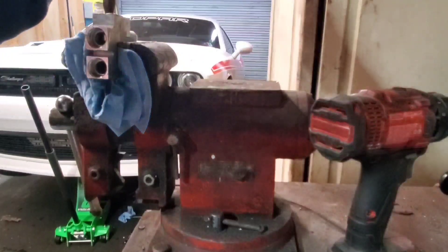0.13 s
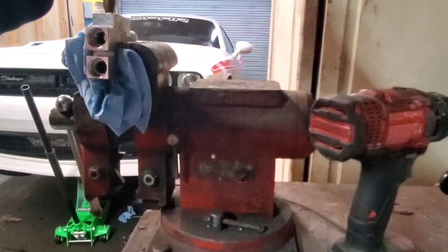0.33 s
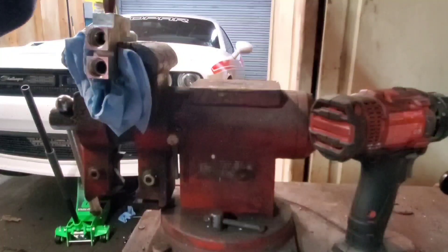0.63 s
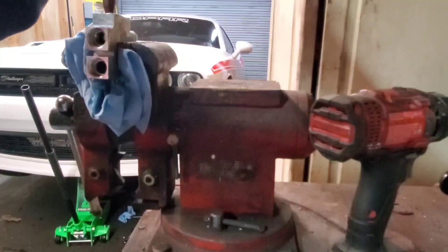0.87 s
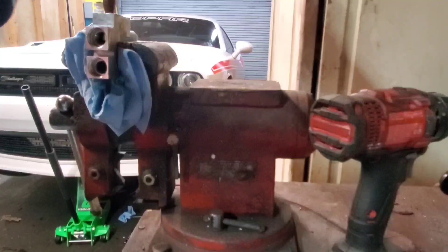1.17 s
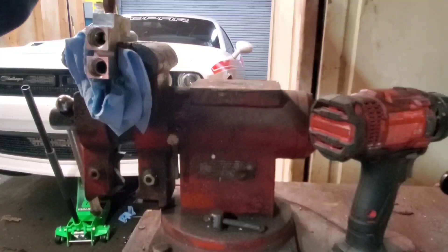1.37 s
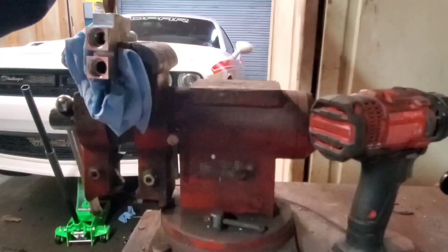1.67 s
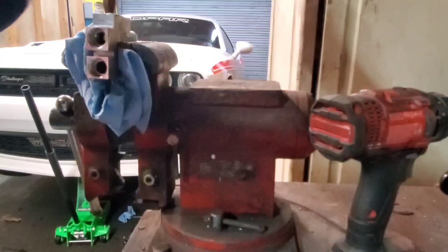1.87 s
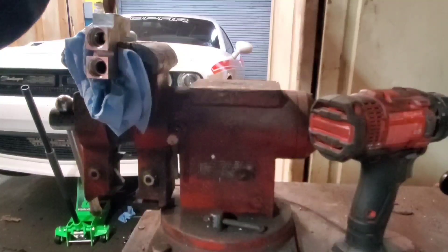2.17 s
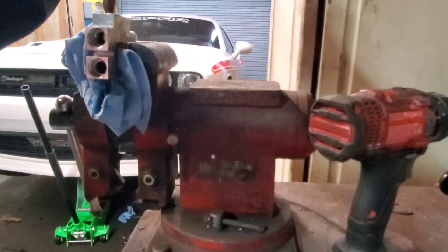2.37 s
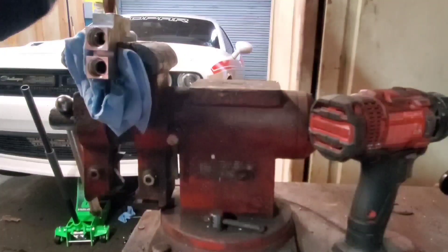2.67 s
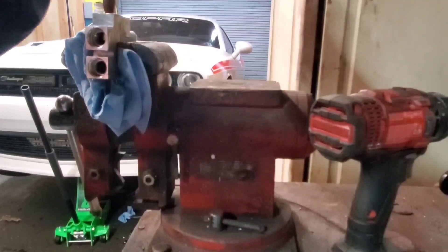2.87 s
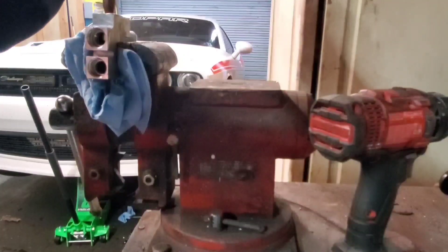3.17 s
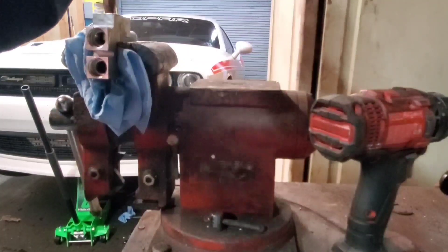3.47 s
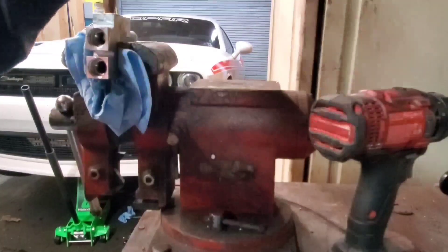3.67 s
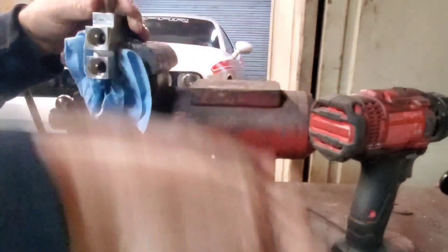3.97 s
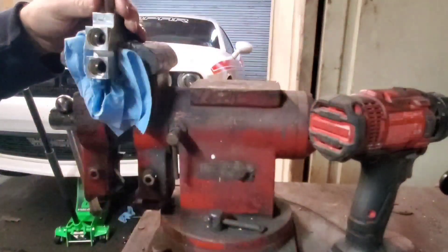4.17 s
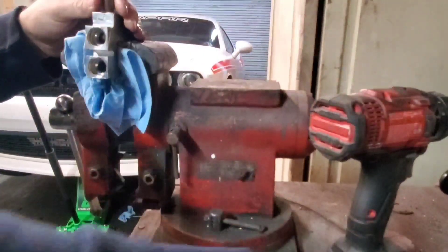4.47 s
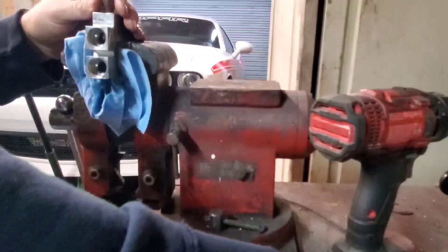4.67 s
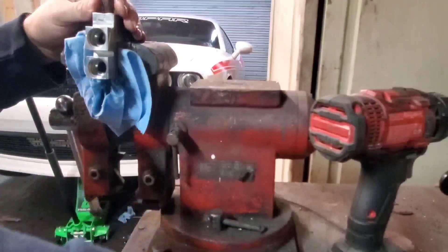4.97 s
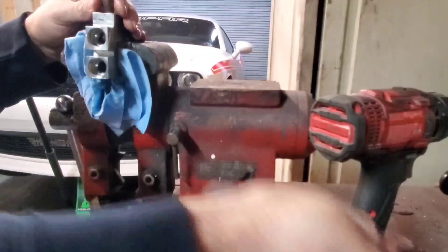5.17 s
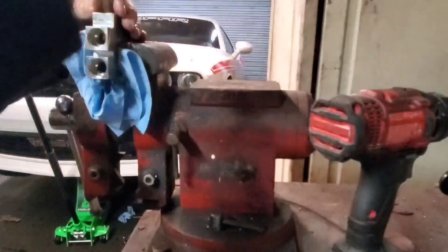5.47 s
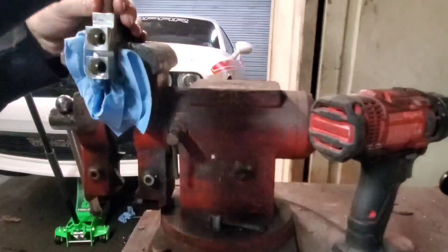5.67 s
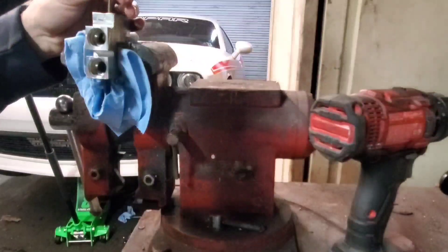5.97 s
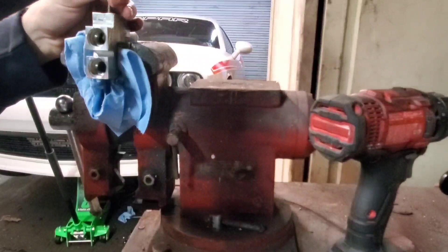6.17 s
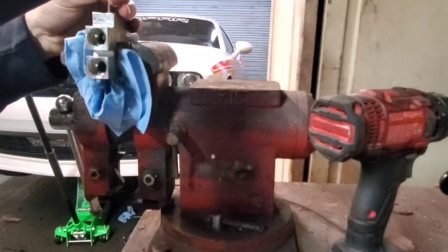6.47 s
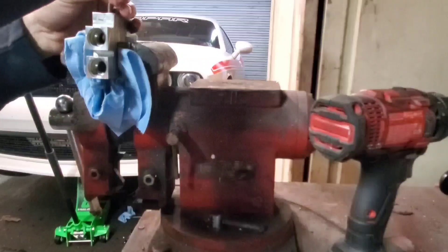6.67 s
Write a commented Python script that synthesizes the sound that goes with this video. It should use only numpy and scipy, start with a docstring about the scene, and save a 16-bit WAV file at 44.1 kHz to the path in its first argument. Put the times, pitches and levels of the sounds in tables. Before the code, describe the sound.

Metal knocks in a workshop, a loud clatter of tools on a wooden bench and a brief rattle, with a low engine drone outside.

```python
"""A garage workshop, with road noise coming through the door throughout. First sleeves rustle and a steel
rod knocks on a part held in a vise, exciting its damped modes, which reverberate in the room. Near 3 s an
engine outside hums; at 3.8 s it catches, and its firing rate climbs to a steady drone. Meanwhile tools
are dropped on and dragged from a wooden bench: the wood thuds, the rod is tapped once, steel clinks.
Near 5.8 s the rod catches in the part, rattles and briefly scrapes; two light knocks and a thud follow."""
import sys
import numpy as np
from scipy import signal
from scipy.io import wavfile

SR = 44100
rng = np.random.default_rng(int(sys.argv[2]) if len(sys.argv) > 2 else 0)


def wav_out(sig):
    """Save sig, one row per channel (or a flat mono array), as 16-bit PCM at SR to the path in sys.argv[1]."""
    wavfile.write(sys.argv[1], SR, np.round(np.clip(np.atleast_2d(sig).T, -1, 1) * 32767).astype(np.int16))


N = 300321

# road noise: (time [s], rumble level [dB], tyre roar level [dB])
ROAD_LEVELS = [(0, -52.5, -67), (.38, -46, -65), (1.0, -52.5, -63.5), (2.1, -51.5, -60), (2.72, -49.5, -62),
               (4.2, -51, -63.5), (5.4, -50.5, -66), (6.81, -48.5, -67)]
# spectra of rumble, tyre roar, microphone hiss and friction: (frequency [Hz], relative density [dB])
RUMBLE_SPECTRUM = [(22, -41), (40, -7), (55, 2), (78, 4.5), (107, -13), (140, -8.5), (242, -19.5)]
ROAR_SPECTRUM = [(150, -12.5), (300, -9), (546, 3), (975, -6.5), (1400, -11.5), (1800, -56)]
HISS_SPECTRUM = [(1500, -5), (5000, -19.5), (7800, -8.5), (10000, -19), (15500, -20.5)]
FRICTION_SPECTRUM = [(1500, -2.5), (7000, -9.5), (9500, -8), (12000, -17.5), (15500, -27.5)]
# likeness of left and right: (frequency [Hz], coherence [ratio])
COHERENCE = [(240, 0.89), (950, 0.76), (3770, 0.12), (15000, 0.0092)]
# sleeves rustling, and a short hissing scrape of the rod near 5.9 s: (time [s], duration [s], level [dB])
RUBS = [(0.443, 0.15, -70), (1.142, 0.066, -74.5), (1.868, 0.15, -73), (2.716, 0.094, -70.5),
        (3.504, 0.2, -68), (3.908, 0.35, -73.5), (4.25, 0.05, -62), (4.72, 0.19, -62.5), (4.94, 0.19, -66),
        (5.909, 0.045, -51), (5.301, 0.033, -68), (6.743, 0.018, -61.5)]
# rod on the part: (time [s], level [dB], centre [Hz], fall-off [dB/octave^2], low-mode gain [dB])
ROD_KNOCKS = [(0.469, -31, 1320, 5, 5), (0.569, -21.5, 3520, 14.5, 55.5), (1.905, -58, 2440, 32, -7),
              (1.997, -32, 2200, 3, 8), (2.069, -36.5, 2410, 16, -11), (2.078, -34.5, 1900, 3.5, -7),
              (2.632, -26, 2380, 5, -5), (6.407, -41.5, 1350, -10.5, -3), (6.569, -46.5, 1636, 3, 1)]
# reverberation: (frequency [Hz], T60 [s], level [dB])
ROOM_DECAY = [(126.6, 1, -9.5), (352, 0.55, -1.5), (1010, 0.38, -1.5), (2870, 0.36, -7),
              (7000, 0.098, -7.5), (13000, .2, -21)]
# tools on the bench, and a tap on the rod: (time [s], level [dB], centre [Hz])
LANDINGS = [(3.55, -38, 360), (4.203, -33.5, 148), (4.311, -6.5, 318), (4.33, -4, 388), (4.363, -10, 477),
            (4.376, -18, 478.4), (4.407, -6.5, 554), (4.453, -17.5, 476), (4.553, -9, 446),
            (4.733, -14.5, 357), (4.747, -7.5, 472), (4.811, -28.5, 164), (4.957, -27, 377),
            (6.578, -41.5, 188.8), (5.026, -23, 196), (5.048, -20.5, 170)]
TAPS = [(3.671, -42, 1964)]
# engine run-up, a fast and a slow term: (shortfall from the final rate [Hz], time constant [s])
RUN_UP = [(24.82, .2), (14, 0.85)]
# steel on steel: (time [s], level [dB], centre [Hz], fall-off [dB/octave^2])
BAR_HITS = [(4.408, -11.5, 7550, 0.41), (4.411, -14, 1994, 5.4), (4.425, -24, 4100, 18),
            (4.455, -24, 3700, 14), (4.512, -37, 3900, 25)]
LOOSE_HITS = [(4.692, -33.5, 5355, 25), (4.703, -20, 9000, 3), (4.758, -22, 9400, 5), (4.765, -22, 3450, 8),
              (5.027, -37.5, 2800, 3), (5.048, -36, 10400, 70), (5.049, -35, 5200, 4)]
# rod catching in the part: (time [s], level [dB])
ROD_CATCHES = [(5.752, -32.5), (5.772, -26.5), (5.78, -28.5), (5.791, -34.5), (5.836, -27), (5.861, -38),
               (5.885, -34.5), (5.926, -30), (5.956, -32.5)]
# normal modes of each struck body: (frequency [Hz], level [dB], T60 [s])
PART_MODES = [(540, 5, 0.029), (717, 4, 0.035), (850, 1, 0.03), (1190, -7, 0.018), (1370, 1, 0.02),
              (1830, 4, 0.018), (2110, 2, 0.013), (2440, 2, 0.011), (3400, 3, 0.013), (3650, 3, 0.013),
              (4700, -2, 0.004)]
BENCH_MODES = [(95.5, -6.5, 0.6), (170.6, -2.5, 0.22), (235, -3, 0.069), (422, 2.5, 0.024),
               (476, -14, 0.068), (515, 6, 0.016), (724, -1, 0.026), (901, 11.5, 0.0051),
               (1192, 13.5, 0.0073), (1450, -3, 0.03)]
ROD_MODES = [(840, -1.6, 0.31), (2220, -5, 0.019), (3696, -0.5, 0.022)]
BAR_MODES = [(1560, -8, .03), (2050, -9, .02), (2762, -21, .12), (3714, -10, .022), (4204, -10, .02),
             (4737, -18, .12), (5787, -15, .17), (6799, -1, .1), (8441, -14, .2), (9555, -3, .13),
             (11350, -19, .22), (12380, -4, .14), (12660, -4, .12), (13580, -8, .12)]
LOOSE_MODES = [(2562, -22, .3), (3284, -6, .012), (4624, -9, .02), (5400, -2, .02), (6438, -5, .05),
               (7327, -7, .045), (9254, -5, .1), (9572, 0, .035), (10390, -9, .15), (11200, -6, .045),
               (11820, 0, .05), (12880, -4, .08)]

TIME = np.arange(N) / SR


def from_db(db):
    """Amplitude ratio: tenfold for every 20 dB."""
    return 10 ** (np.asarray(db) / 20)


def rms_one(x):
    """Normalisation to unit mean power."""
    return x / np.sqrt(np.mean(x ** 2) + 1e-20)


def at_hz(points, hz):
    """Interpolation of a table over log frequency."""
    table = np.array(points)
    return [np.interp(np.log(hz), np.log(table[:, 0]), c) for c in table.T[1:]]


def filtered(x, order, hz, kind="low"):
    """Butterworth filtering: a maximally flat passband."""
    return signal.sosfilt(signal.butter(order, hz, kind, fs=SR, output="sos"), x)


def drift(rate_hz):
    """Random modulation: low-passed noise of unit rms."""
    step = 40
    pole = np.exp(-2 * np.pi * rate_hz * step / SR)
    white = rng.standard_normal(N // step + 2002)
    slow = signal.lfilter([1], [1, -2 * pole, pole * pole], white)[2000:]
    return np.interp(np.arange(N) / step, np.arange(len(slow)), rms_one(slow))


def bands(low_hz, high_hz):
    """Half-octave division: geometric centre and edges of each band."""
    edges = 20 * 2 ** np.arange(0, 10, .5)
    return [(np.sqrt(a * b), [a, b]) for a, b in zip(edges, edges[1:]) if low_hz <= a < high_hz]


def coloured_noise(spectrum, flicker_db, coherence_scale):
    """Partially coherent stereo noise of unit rms; each band flickers independently."""
    out, white = 0, rng.standard_normal((2, 2, N))
    for k, (hz, edges) in enumerate(bands(spectrum[0][0] * .7, spectrum[-1][0])):
        mid, side = filtered(white[k % 2], 2, edges, "band")
        alike = np.clip(coherence_scale * at_hz(COHERENCE, hz)[0], -1, 1)
        gain = from_db(at_hz(spectrum, hz)[0] + flicker_db * drift(24))
        out = out + gain * (np.sqrt(1 + alike) * mid + np.sqrt(1 - alike) * side * [[1], [-1]])
    return rms_one(out)


def right_later(pair, lag_s):
    """Path difference: sound from the left reaches the right microphone later."""
    return np.array([pair[0], np.interp(TIME - lag_s, TIME, pair[1])])


def road():
    """Broadband traffic noise: low rumble and less coherent tyre roar vary slowly in level."""
    times, rumble_db, roar_db = np.transpose(ROAD_LEVELS)
    rumble = coloured_noise(RUMBLE_SPECTRUM, flicker_db=1, coherence_scale=1)
    roar = coloured_noise(ROAR_SPECTRUM, flicker_db=-3.5, coherence_scale=.33)
    return (from_db(np.interp(TIME, times, rumble_db)) * rumble
            + from_db(np.interp(TIME, times, roar_db)) * roar)


def hiss():
    """Self-noise of the microphone: a faint treble floor."""
    return from_db(-81.5) * coloured_noise(HISS_SPECTRUM, flicker_db=2.5, coherence_scale=1)


def friction(attack_share=.4, release_s=.04):
    """Sliding friction: each sleeve rustle, and the rod's hissing scrape, swells, flickers and fades."""
    envelope = 0
    for start, length, db in RUBS:
        swell = np.sin(np.pi / 2 * np.clip((TIME - start) / (attack_share * length), 0, 1)) ** 2
        fade = np.exp(-np.maximum(TIME - start - length, 0) / release_s)
        envelope += from_db(db) * swell * fade
    flicker = from_db(2 * drift(14))
    return envelope * flicker * coloured_noise(FRICTION_SPECTRUM, flicker_db=5, coherence_scale=.3)


def strike(blows, modes, spread_db, lag_s, pan_db, rise_s, chatter_s, chatter_db, crack_db, top_ratio,
           fall_db=None, low_hz=900, beat_hz=45):
    """Modal superposition: an impulse and its chatter drive damped modes; the chatter also cracks."""
    times, level_db, centre, *shaping = np.transpose(blows)
    hz, mode_db, t60 = np.transpose(modes)
    fall = shaping[0][:, None] if shaping else fall_db
    octaves = np.log2(hz / centre[:, None])
    weights = from_db(mode_db - fall * octaves ** 2 + spread_db * rng.standard_normal(octaves.shape))
    if len(shaping) > 1:
        weights *= from_db(shaping[1][:, None] * (hz < low_hz))
    weights *= rng.choice([-1, 1], weights.shape)
    t, out = np.arange(SR // 4) / SR, np.zeros(N + SR)
    split_hz = beat_hz * rng.random((len(hz), 1))
    beat = 1 + .55 * np.cos(2 * np.pi * split_hz * t)   # closely spaced modes beat
    rings = beat * np.sin(2 * np.pi * hz[:, None] * t) * from_db(-60 * t / t60[:, None])
    rise = 1 - np.exp(-t / rise_s)
    for k, start in enumerate(times):
        chatter = rng.standard_normal(len(t)) ** 3 * from_db(-60 * t / chatter_s) * rise
        crack = filtered(chatter, 2, centre[k] / 2, "high")
        force = from_db(chatter_db) * chatter / np.linalg.norm(chatter) + (t == 0)
        body = rise * signal.fftconvolve(weights[k] @ rings, force)[:len(t)]
        sound = body / np.abs(body).max() + from_db(crack_db) * crack / np.abs(crack).max()
        top_hz = min(top_ratio * centre[k], .45 * SR)   # a soft contact lacks treble
        at = round(start * SR)
        out[at:at + len(t)] += from_db(level_db[k]) * filtered(sound, 4, top_hz)
    return from_db(np.array([[.5], [-.5]]) * pan_db) * right_later([out[:N], out[:N]], lag_s)


def knocks():
    """Impact excitation: the rod rings the quickly damped modes of the clamped part."""
    return strike(ROD_KNOCKS, PART_MODES, spread_db=2, lag_s=.00013, pan_db=6, rise_s=.0015,
                  chatter_s=.038, chatter_db=10.5, crack_db=-13, top_ratio=1.7)


def near_echo(x):
    """Comb filtering: a reflection off bench and vise adds on the left and subtracts on the right."""
    delayed = right_later(x, lag_s=.0019)[1]
    return from_db(-5) * filtered(delayed, 2, 800, "high") * [[1], [-1]]


def garage(x):
    """Diffuse reverberation: a noise tail decays exponentially in each band, most coherent in the bass."""
    t, tail = np.arange(SR) / SR, 0
    for hz, edges in bands(40, 16000):
        t60, level_db = at_hz(ROOM_DECAY, hz)
        decay = rng.standard_normal((2, SR)) * from_db(-60 * t / t60) * (t > .004)
        alike = at_hz(COHERENCE, 2 * hz)[0]
        decay[1] = alike * decay[0] + np.sqrt(1 - alike ** 2) * decay[1]
        tail = tail + from_db(level_db) * filtered(decay / np.linalg.norm(decay[0]), 2, edges, "band")
    return signal.fftconvolve(x, tail, axes=1)[:, :N]


def hum(start_s=2.74, length_s=1, hz=129):
    """Amplitude modulation: a faint pure tone wavers before the engine catches."""
    gate = np.clip(np.minimum(TIME - start_s, start_s + length_s - TIME) / .024, 0, 1)
    return np.sqrt(2) * from_db(-59.5 + 2 * drift(3.6)) * gate * np.sin(2 * np.pi * hz * TIME)


def thuds(rock_s=.023, loss_db=9, dulling=.46):
    """Inelastic collision: each tool lands on the bench and rocks twice, weaker and duller each time."""
    gaps = rock_s * (1 + .1268 * rng.standard_normal((len(LANDINGS), 2)))
    rocks = [(start + gap[:k].sum(), db - k * loss_db, hz * dulling ** k)
             for (start, db, hz), gap in zip(LANDINGS, gaps) for k in (1, 2)]
    return strike(LANDINGS + rocks, BENCH_MODES, fall_db=5, spread_db=0, lag_s=.0002, pan_db=1.6,
                  rise_s=.0012, chatter_s=.025, chatter_db=-10.5, crack_db=-12, top_ratio=7.3)


def rod_tap():
    """Free vibration: the loosely held rod rings on in its lowest mode."""
    return strike(TAPS, ROD_MODES, fall_db=0, spread_db=1, lag_s=.00013, pan_db=8, rise_s=.00098,
                  chatter_s=.15, chatter_db=12, crack_db=-20, top_ratio=14)


def engine(start_s=3.8, top_hz=87.7, drone_db=-40.5, db_per_hz=.4):
    """Periodic firing: the fundamental rises exponentially to a steady drone while its octave fades."""
    t = np.maximum(TIME - start_s, 0)
    onset = np.minimum(t / .0095, 1)
    shortfall_hz = sum(hz * np.exp(-t / tau_s) for hz, tau_s in RUN_UP)
    phase = 2 * np.pi * np.cumsum(top_hz - shortfall_hz) / SR
    surge_db = 18 * np.exp(-t / .13)
    firing_db = drone_db - db_per_hz * shortfall_hz + surge_db + .31 * drift(1.5)
    octave = from_db(-47.5 - 19.5 * t) * np.sin(2 * phase)
    return np.sqrt(2) * onset * (from_db(firing_db) * np.sin(phase) + octave)


def clinks():
    """Hard contact excites high inharmonic modes, first of a steel bar, then of loose steel."""
    bar = strike(BAR_HITS, BAR_MODES, spread_db=1, lag_s=.00006, pan_db=6, rise_s=.00089,
                 chatter_s=.058, chatter_db=-6.5, crack_db=5, top_ratio=2.1)
    loose = strike(LOOSE_HITS, LOOSE_MODES, spread_db=2, lag_s=.00006, pan_db=3, rise_s=.0006,
                   chatter_s=.039, chatter_db=19, crack_db=-1.5, top_ratio=1.3)
    return bar + loose


def rattle(count=9, centre_hz=2280, fall_db=1.5, low_gain_db=1.5):
    """Intermittent contact: the rod, pushed into the part, catches, with light random touches between."""
    times = rng.uniform(ROD_CATCHES[0][0], ROD_CATCHES[-1][0], count)
    touches = zip(times, -41 + 3 * rng.standard_normal(count))
    blows = [(start, db, centre_hz, fall_db, low_gain_db) for start, db in [*ROD_CATCHES, *touches]]
    return strike(blows, PART_MODES, spread_db=3, lag_s=.0001, pan_db=4.5, rise_s=.00055,
                  chatter_s=.063, chatter_db=9, crack_db=0, top_ratio=4.1)


def scene():
    """Linear superposition of outdoor noise, hiss, friction, impacts and their reflections."""
    impacts = knocks() + thuds() + rod_tap() + clinks() + rattle()
    impacts[0] = filtered(impacts[0], 3, 8500)   # the left microphone is shaded from the top treble
    impacts += near_echo(impacts)
    outdoors = right_later(road() + hum() + engine(), lag_s=.000056)
    return outdoors + hiss() + friction() + impacts + garage(impacts)


def record(dry):
    """Soft saturation rounds the peaks; a steep low-pass limits the bandwidth."""
    ceiling, stop_hz = .9, 16400
    rounded = ceiling * np.tanh(dry / ceiling)
    return signal.sosfilt(signal.cheby2(12, 70, stop_hz, fs=SR, output="sos"), rounded)


dry = scene()
out = record(dry)
wav_out(out)
```